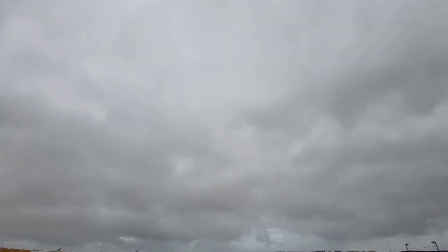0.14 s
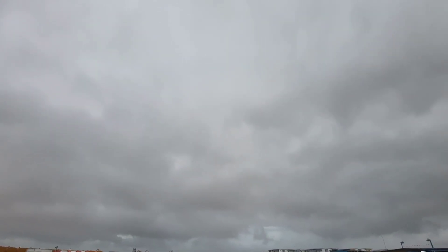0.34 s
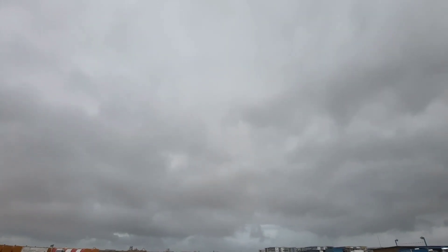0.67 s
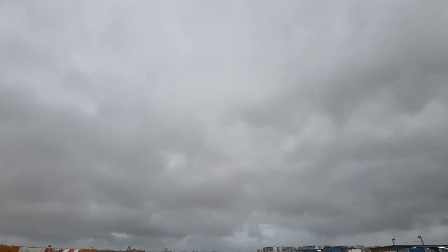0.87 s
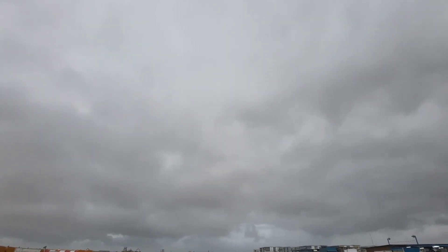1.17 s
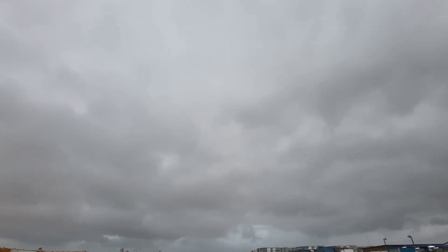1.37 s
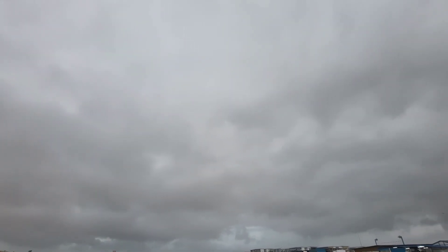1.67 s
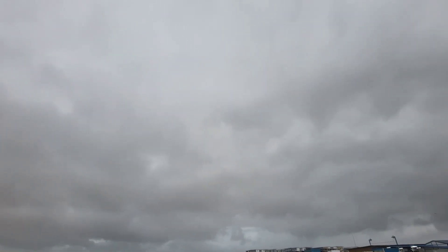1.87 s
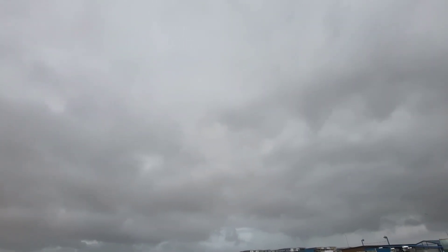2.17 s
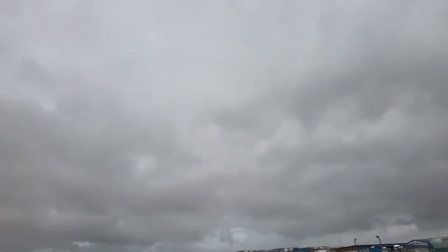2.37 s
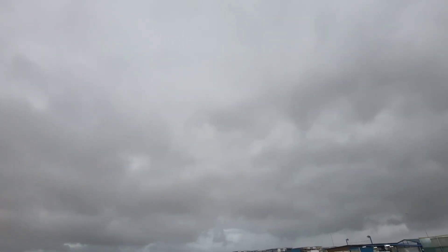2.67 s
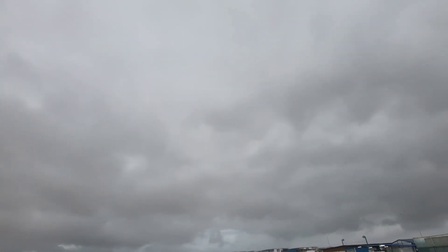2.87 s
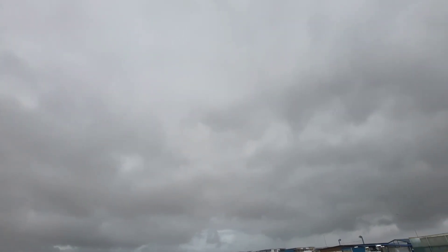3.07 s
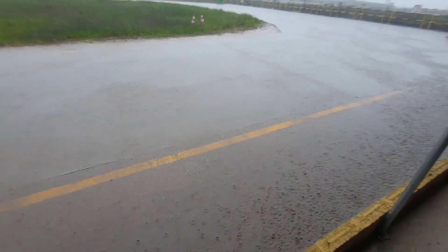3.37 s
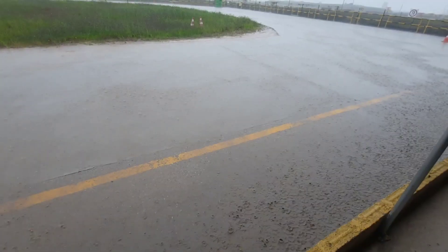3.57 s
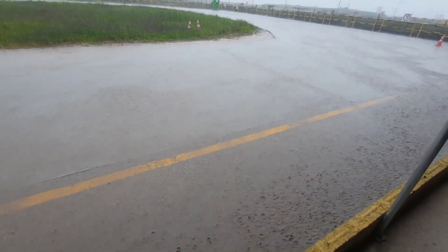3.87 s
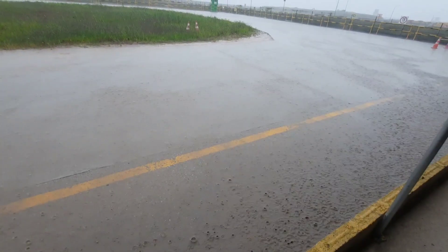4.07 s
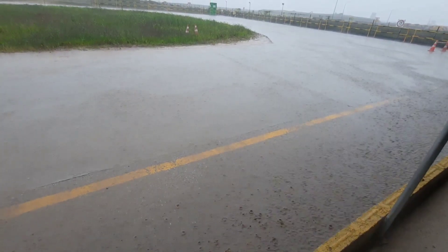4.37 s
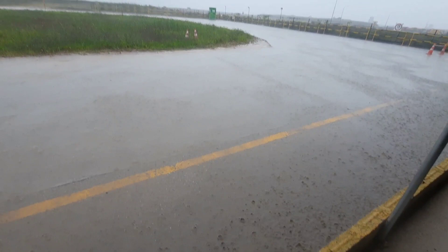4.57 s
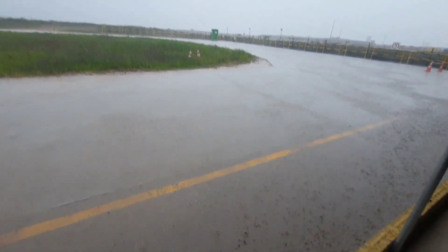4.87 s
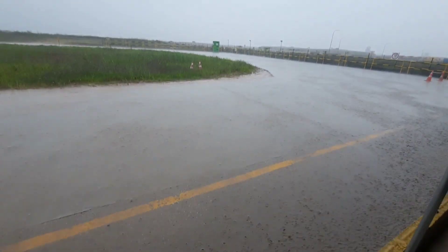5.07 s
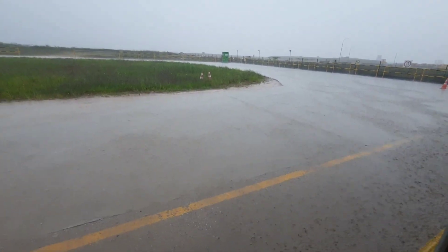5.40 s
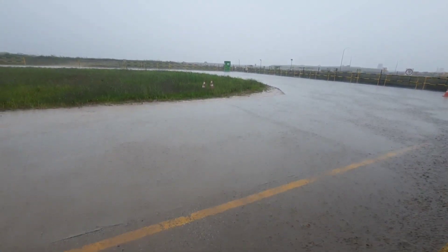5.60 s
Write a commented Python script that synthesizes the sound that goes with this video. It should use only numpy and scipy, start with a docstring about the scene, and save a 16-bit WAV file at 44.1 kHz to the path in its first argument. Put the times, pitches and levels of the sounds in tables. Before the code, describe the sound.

Faint handling scuffs and soft knocks over quiet dull air, a tiny silent gap, then a sudden loud downpour hissing on wet asphalt with wind rumble.

```python
"""A downpour on wet asphalt, heard from its edge: noise forms a dense wash, short bursts tick as nearer drops,
and low noise with brief pushes gives the rumble and buffets of wind. Before it, after which a short silence
falls, a camera pans in a quiet place: bursts of tiny slips scuff its housing and pushes ring two low modes
as soft knocks, over dull air noise and the sine tones of a faint hum, whine and whistle."""
import sys
import numpy as np
from scipy import signal
from scipy.fft import rfft, irfft, next_fast_len
from scipy.io import wavfile

SR = 44100
rng = np.random.default_rng(int(sys.argv[2]) if len(sys.argv) > 2 else 0)


def waveform_to_disk(signal):
    """Save audio, clipped to [-1, 1], as 16-bit WAV at the path in sys.argv[1]."""
    frames = np.transpose(np.atleast_2d(signal))
    scaled = np.clip(frames, -1, 1) * 32767
    samples = np.round(scaled).astype(np.int16)
    wavfile.write(sys.argv[1], SR, samples)


N = 253134
T = np.arange(N) / SR

# scuffs on the housing: peak_s, level_db, pitch_hz, nudge_db (push on the housing), swell_s, treble_db,
# clean_share (squeak, 0-1)
SCUFFS = [(.003, -51, 2000, -56, .005, -11, .1), (.079, -57, 2150, -54, .006, -9, 0.2),
          (.217, -52.5, 1860, -47.5, 0.013, -4, .4), (.261, -56, 2140, -51, 0.011, 9, .05),
          (.333, -62, 2200, -54, .012, 4, .05), (.376, -57, 2050, -47, 0.012, -10, .2),
          (.44, -64, 2250, -58, 0.013, -1, .1), (.485, -62, 2200, -54, .012, -1, .1),
          (0.546, -53.5, 1970, -48, 0.011, -10, .25), (.577, -58, 2100, -55, 0.0095, -13, .2),
          (.679, -56, 1920, -49, .014, 4, 0.2), (.713, -56.5, 2400, -56, 0.016, 3, .15),
          (.766, -55.5, 2200, -54, .004, -3, .15), (.812, -64, 2050, -66, .003, -8, .4),
          (.837, -60, 2150, -56, .002, -1, .05), (.871, -51, 1850, -53, 0.0061, -3, .3),
          (.935, -56.5, 2200, -48, .011, -2, 0), (.986, -55.5, 2060, -49, .008, -9, .3),
          (1.166, -47.5, 2140, -55, 0.0088, 1, .2), (1.226, -58.5, 2000, -54, .006, -13, .2),
          (1.356, -48.5, 2100, -51.5, 0.0081, -4.5, 0), (1.464, -55, 2150, -61, .006, 1, 0),
          (1.479, -52, 2130, -44.5, 0.0067, 0, 0), (1.538, -54, 2300, -52, 0.009, 1, .25),
          (1.609, -44.5, 2300, -53, 0.0025, 2, 0.34), (1.795, -52.5, 2070, -48.5, 0.0082, 3, .1),
          (1.845, -63, 2250, -58, 0.0066, -5, 0.2), (1.908, -50.5, 1940, -45, .004, -8, .35),
          (2.071, -49, 2130, -52, 0.0034, -1, .3), (2.264, -47, 2100, -55, 0.0058, -1, 0.1),
          (2.362, -48.5, 2210, -43.5, 0.002, -4, .25), (2.391, -56.5, 2300, -51, 0.0044, 3, .15),
          (2.522, -53, 2050, -58, .0015, -3, .15), (2.654, -70, 2100, -57, 0.011, -3, .1),
          (2.728, -46, 1880, -66, .002, -0.5, 0.63), (2.79, -59, 2050, -62, 0.0046, 5, .1),
          (2.808, -58.5, 1850, -60, .003, 3, .2), (2.89, -62, 2150, -58, .007, 7, .05),
          (2.984, -54.5, 2090, -46, 0.02, -2, 0), (3.043, -61, 2300, -54, .005, -5, .15),
          (3.168, -49.5, 2370, -47, 0.005, 2, .2), (3.184, -43.5, 1830, -50, .003, 4, 0.1)]
# colour of slips on the housing: freq_hz, gain_db
SCRAPE = [(150, -24), (500, -19), (900, -1), (1200, -3), (1500, -5), (1900, -1.5), (2400, -0.5), (2800, -7),
          (3400, -2.5), (3900, -12.5), (4700, -10), (5900, -9.5), (7500, -16), (11500, -21.5), (15500, -25)]
# progress of the camera's turn from the near splashes: time_s, turn (share)
TURN = [(3.35, 0.049), (4.15, 0.28), (4.55, 1.13), (5.7, 1.23)]


def amp(db):
    """Decibels to gain."""
    return 10 ** (np.asarray(db) / 20)


def evened(x):
    """Scales to an rms of one."""
    return x / np.sqrt(np.mean(x ** 2) + 1e-20)


def read(table, hz):
    """Columns of a spectrum table at the given frequencies, joined on a log axis."""
    f, *columns = np.transpose(table)
    return np.array([np.interp(np.log(hz + 1), np.log(f + 1), c) for c in columns])


def curve(table):
    """A control curve at every sample."""
    return np.interp(T, *np.transpose(table))


def filtered(x, gain):
    """Applies a gain, given as a function of frequency."""
    size = next_fast_len(x.shape[-1], True)
    spectrum = rfft(x, size) * gain(np.fft.rfftfreq(size, 1 / SR))
    return irfft(spectrum, size)[..., :x.shape[-1]]


def coloured(x, table):
    """Shapes a sound by a table of decibels over frequency."""
    return filtered(x, lambda hz: amp(read(table, hz)))


def mode(hz, centre_hz, width_hz):
    """Response of one resonance, gain one at its centre."""
    return 1j * hz * width_hz / (centre_hz ** 2 - hz ** 2 + 1j * hz * width_hz)


def wander(rate_hz):
    """Slow random drift of rms one."""
    return evened(filtered(rng.standard_normal(N), lambda hz: np.exp(-(hz / rate_hz) ** 2)))


def from_left(x, same, lag_s=0.0004755):
    """Row 0 reaches the left port, then the right; row 1 is what only the right one hears."""
    late = filtered(x[0], lambda hz: np.exp(-2j * np.pi * hz * lag_s))
    return np.array([x[0], same * late + np.sqrt(1 - same ** 2) * x[1]])


def port_noise():
    """White noise of unit density at two ports, alike in the bass and nearly unrelated in the treble."""
    # freq_hz, likeness (0-1), left_lead_rad
    ports = [(60, .88, .1), (220, .77, 0), (380, .78, -.1), (570, .68, -.5), (850, .55, -.8),
             (1250, .2, -1.1), (1650, .38, -3.6), (2200, .07, -3.2), (5000, .03, -3)]
    left, other = rng.standard_normal((2, N)) * np.sqrt(SR / 2)
    same = lambda hz: np.clip(read(ports, hz)[0], 0, 1)
    shared = filtered(left, lambda hz: same(hz) * np.exp(-1j * read(ports, hz)[1]))
    own = filtered(other, lambda hz: np.sqrt(1 - same(hz) ** 2))
    return np.array([left, shared + own])


def add(mix, start_s, sound):
    """Mixes a sound in from a time that may be before the start."""
    at = round(start_s * SR)
    sound = sound[:, max(-at, 0):]
    part = mix[:, max(at, 0):][:, :sound.shape[1]]
    part += sound[:, :part.shape[1]]


def puff(peak_s, length_s, centre_hz, width):
    """A short, low push of rms one at its peak; width is a share of the centre frequency."""
    window = np.exp(-((T - peak_s) / length_s) ** 2 / 2)
    noise = rng.standard_normal(N) * window
    push = filtered(noise, lambda hz: abs(mode(hz, centre_hz, width * centre_hz)) ** 2)
    return push * np.linalg.norm(window) / np.linalg.norm(push)


def still_air():
    """A dull, lumpy background noise with an uneven bass."""
    # freq_hz, gain_db
    air_colour = [(25, -102), (58, -82.5), (120, -80.5), (200, -87), (245, -88), (305, -76.5), (400, -83),
                  (510, -83.5), (750, -88), (1300, -99.5), (2300, -100), (2800, -106), (3900, -116),
                  (6000, -115), (8000, -125), (15000, -129)]
    air_db, lumpy_db = -1, 2
    bass_db, uneven_db, uneven_hz = -3, 3.5, 7
    lumps = evened(filtered(rng.standard_normal(N), lambda hz: np.exp(-hz / 25)))
    noise = rng.standard_normal((2, N)) * np.sqrt(SR / 2) * amp(air_db + lumpy_db * lumps)
    air = from_left(coloured(noise, air_colour), same=0.62)
    bass = filtered(air, lambda hz: 1 / (1 + (hz / 190) ** 4))
    return air + bass * (amp(bass_db + uneven_db * wander(uneven_hz)) - 1)


def tone(pitch_hz, waver_db=1.5):
    """A sine of steady pitch, near rms one, whose strength wavers."""
    waver = evened(filtered(rng.standard_normal(N), lambda hz: np.exp(-hz / 2)))
    return amp(waver_db * waver) * np.sqrt(2) * np.sin(2 * np.pi * pitch_hz * T)


def switched(runs, ramp_s=0.025):
    """Strength of a tone that comes and goes in short ramps."""
    strength = np.zeros(N)
    for start_s, stop_s, level_db in runs:
        inside_s = np.minimum(T - start_s, stop_s - T)
        strength += amp(level_db) * np.clip(inside_s / ramp_s + 0.5, 0, 1)
    return strength


def motors():
    """Hum of a distant machine, a whine (perhaps a small motor) and a thin whistle that come and go."""
    # pitch_hz, level_db
    hum_line = (236.5, -68)
    # start_s, stop_s, level_db (added to the idle whine)
    whine_runs = [(0, 0.204, -72), (.38, .57, -72), (0.863, 1.13, -74), (1.27, 1.48, -75), (1.82, 2, -72.5),
                  (2.16, 2.38, -77.5)]
    # start_s, stop_s, level_db
    whistle_runs = [(.43, .52, -83), (.58, .66, -78), (.78, 1.2, -88), (1.26, 1.46, -82)]
    whine_hz, whine_idle_db, whistle_hz = 885, -87, 3149
    hum = amp(hum_line[1]) * tone(hum_line[0])
    whine = (amp(whine_idle_db) + switched(whine_runs)) * tone(whine_hz)
    whistle = switched(whistle_runs) * tone(whistle_hz)
    return hum + whine + whistle


def thumps():
    """Low noise pushes as the whole camera is jogged, alike at both ports."""
    # peak_s, level_db, length_s, centre_hz
    jogs = [(0.027, -51.5, .016, 90), (0.317, -58, .014, 150), (3.109, -49, .008, 80),
            (3.15, -50, 0.0095, 105)]
    return sum(amp(db) * puff(s, length_s, centre_hz, width=1.3) for s, db, length_s, centre_hz in jogs)


def knocks():
    """Soft uneven pushes, alone or just after a scuff, ring the two low modes of the housing."""
    # peak_s, level_db, upper_db (upper mode over lower)
    lone_knocks = [(.008, -40.5, -12), (.322, -43.5, -11), (.787, -44, -24), (.842, -50, 16),
                   (1.134, -47, 0), (1.331, -47.5, 14), (1.654, -48.5, 1), (2.015, -51, -12),
                   (2.114, -50, -6), (2.469, -48, 16), (2.85, -44, -14), (3.159, -48, 7),
                   (3.206, -41.5, 10)]
    # lower and upper mode: centre_hz, width_hz (both scaled by the grip)
    housing = [(315, 23), (480, 23)]
    push_s, lead_s, grip_spread = 0.00698, 0.04, 0.022
    nudge_lag_s, nudge_upper_db = 0.00699, 7
    out, t = np.zeros((2, N)), np.arange(SR // 4) / SR - lead_s
    nudges = [(s + nudge_lag_s, nudge_db, nudge_upper_db) for s, _, _, nudge_db, *_ in SCUFFS]
    for s, db, upper_db in lone_knocks + nudges:
        force = rng.standard_normal((2, len(t))) * np.exp(-(t / push_s) ** 2)
        grip = np.exp(grip_spread * rng.standard_normal())  # the hand shifts the modes a little

        def response(hz):
            lower, upper = (mode(hz * grip, *m) for m in housing)
            return (lower + amp(upper_db) * upper) * mode(hz, 380, 600)

        body = filtered(force, response)
        body = np.sqrt(2) * body / abs(body).max(1, keepdims=True)
        add(out, s - lead_s - push_s, amp(db) * body)
    return from_left(out, same=0.7)


def rubbing():
    """Duller rubs as the grip shifts: noise rings at a pitch, catching unevenly as it swells and dies."""
    # peak_s, level_db, rise_s, pitch_hz
    rubs = [(.02, -49, 0.061, 1380), (.32, -58.5, 0.09, 1280), (3.093, -50, 0.002, 1150)]
    # freq_hz, gain_db
    rub_colour = [(150, -11), (350, 3), (700, -0.5), (950, 0), (1150, -0.5), (1550, -6), (2500, -11),
                  (6000, -29), (15000, -35)]
    ring, ring_width_hz, fade_s = 1.3, 200, 0.084
    catch_db, catch_hz = 2, 70
    out = np.zeros((2, N))
    for s, db, rise_s, pitch_hz in rubs:
        noise = coloured(rng.standard_normal((2, N)), rub_colour)
        scrape = filtered(noise, lambda hz: 1 + ring * mode(hz, pitch_hz, ring_width_hz))
        envelope = np.exp(-np.maximum((s - T) / rise_s, (T - s) / fade_s))
        out += amp(db) * evened(scrape) * envelope
    return from_left(out * evened(amp(catch_db * wander(catch_hz))), same=0.21)


def rustle():
    """Faint, duller single slips at random times, each a puff of noise with the scrape colour."""
    slips_per_s, level_db, spread_db = 140, -68, 3
    die_s, dull_hz = 0.0041, 5000
    t = np.arange(SR // 15) / SR
    strength = amp(spread_db * np.minimum(rng.exponential(1, N), 3))
    hits = (rng.random(N) < slips_per_s / SR) * strength
    contact = signal.oaconvolve(hits, t * np.exp(-t / die_s))[:N]
    slips = filtered(rng.standard_normal((2, N)) * contact, lambda hz: 1 / np.hypot(1, hz / dull_hz))
    return amp(level_db) * evened(from_left(coloured(slips, SCRAPE), same=0.63))


def ripple(depth_db, count=110):
    """Random gains at log-spaced frequencies: freq_hz, gain_db."""
    gain_db = depth_db * np.clip(rng.standard_normal(count), -2, 2)
    return np.transpose([np.geomspace(900, 15000, count), gain_db])


def squeak(pitch_hz, size, wobble=0.025, wobble_hz=90):
    """Slips that fall into step give a short, unsteady tone of rms one."""
    drift = evened(filtered(rng.standard_normal((2, size)), lambda hz: np.exp(-hz / wobble_hz)))
    turns = np.cumsum(pitch_hz * (1 + wobble * drift), axis=1) / SR + rng.random((2, 1))
    return np.sqrt(2) * np.sin(2 * np.pi * turns)


def scuffs():
    """Tiny slips swell, let go with a snap and a squeak, ring the shell and die in a short, duller tail."""
    ring, ring_width_hz, treble_hz = 0.85, 260, 3500
    ragged_db, grit, slip_samples = 4, 0.39, 30
    lead_s, steep, fall_s, snap, snap_s = 0.08, 1.8, 0.016, 0.31, 0.0016
    tail_db, tail_s, tail_hz = -11, 0.07, 5000
    out, t = np.zeros((2, N)), np.arange(SR // 3) / SR - lead_s
    after_s = np.maximum(t, 0)
    release = np.exp(-(after_s / fall_s) ** 2) + snap * (t > 0) * np.exp(-after_s / snap_s)
    for s, db, pitch_hz, _, swell_s, treble_db, clean_share in SCUFFS:
        # every contact point rings a little differently
        slips = coloured(rng.standard_normal((2, len(t))), ripple(ragged_db))
        steps = np.repeat(rng.standard_normal(len(t)), slip_samples)[:len(t)]
        slips = slips * np.exp(grit * steps)

        def shell(hz):
            shelf = hz ** 4 / (hz ** 4 + treble_hz ** 4)
            return (1 + ring * mode(hz, pitch_hz, ring_width_hz)) * amp(treble_db * shelf)

        scrape = evened(filtered(coloured(slips, SCRAPE), shell))
        clean = np.sqrt(clean_share) * squeak(pitch_hz, size=len(t))
        contact = np.sqrt(1 - clean_share) * scrape + clean
        stroke = (1 - amp(tail_db)) * contact * release
        dull = filtered(scrape, lambda hz: 1 / np.hypot(1, hz / tail_hz))
        ringing = amp(tail_db) * dull * np.exp(-after_s / tail_s)
        swell = 1 / (1 + abs(np.minimum(t, 0) / swell_s) ** steep)
        add(out, s - lead_s, amp(db) * (stroke + ringing) * swell)
    return from_left(out, same=0.71)


def wind():
    """Lumpy low noise: gusts drive its deep part, its upper part fades in the turn, and buffets strike."""
    # freq_hz, gain_db (before levelling)
    rumble_colour = [(22, -35), (33, -21), (47, -4), (57, -2), (66, -0.5), (76, 3.5), (88, -3.5),
                     (103, -1.5), (118, -5), (131, 0.5), (146, -5), (180, -8.5), (260, -26), (600, -63)]
    # time_s, deep_gain_db
    gust = [(3.35, -4.5), (3.85, -7), (4.35, 0.5), (4.62, 1.5), (4.8, 4.5), (4.95, -5), (5.2, 1), (5.7, -3)]
    # peak_s, level_db (before the port gains), length_s, centre_hz, port (0 left to 1 right)
    buffets = [(3.504, -24, 0.016, 85, 0.46), (3.55, -27, 0.011, 300, 0.44), (3.622, -26.5, .016, 70, 0.44),
               (3.78, -21.5, 0.027, 129, .5), (4.022, -22.5, 0.027, 85, 0.45),
               (4.145, -23.5, 0.023, 105, 0.47), (4.434, -20, 0.015, 75, 0.64),
               (4.441, -21, 0.019, 365, 0.44), (4.546, -19.5, 0.026, 116, 1), (4.709, -20, 0.037, 96, 0.67),
               (4.787, -25, .05, 315, 0.56), (4.83, -15.5, 0.011, 70, 0.75),
               (5.042, -17, 0.025, 71.4, 0.47), (5.127, -26, 0.028, 100, 0.44),
               (5.369, -22, 0.024, 316, 0.48)]
    base_db, lumpy_db, lumpy_hz = -26.5, 1, 8
    deep_hz, upper_db, upper_turn_db = 105, 2, -3
    rumble = evened(coloured(port_noise(), rumble_colour)) * amp(base_db + lumpy_db * wander(lumpy_hz))
    deep = filtered(rumble, lambda hz: 1 / (1 + (hz / deep_hz) ** 8))
    upper = (rumble - deep) * amp(upper_db + upper_turn_db * curve(TURN))
    out = deep * amp(curve(gust)) + upper
    for s, db, length_s, centre_hz, port in buffets:
        port_gains = np.sqrt(2) * np.array([[1 - port], [port]])
        out += amp(db) * port_gains * puff(s, length_s, centre_hz, width=0.52)
    return out


def near_drops():
    """Random splashes about a millisecond long, of 24 noise shapes, weighted to the treble."""
    drops_per_s, spread_db, across = 2600, 3.5, 0.18  # rate at each port
    size = amp(spread_db * np.minimum(rng.exponential(1, (2, N)), 5)) * rng.choice([-1, 1], (2, N))
    hits = size * (rng.random((2, N)) < drops_per_s / SR)
    kind, t = rng.integers(0, 24, (2, N)), np.arange(256) / SR
    near = np.zeros((2, N))
    for k in range(24):
        splash = evened(rng.standard_normal(len(t)) * np.exp(-t / 0.00032))
        near += signal.oaconvolve(hits * (kind == k), splash[None], axes=1)[:, :N]
    # splashes on the right reach the left port 10 samples later
    near[0] = (near[0] + across * np.roll(near[1], 10)) / np.hypot(1, across)
    return evened(filtered(near, lambda hz: hz / (hz + 1200))) * np.sqrt(SR / 2)


def rain():
    """Countless far drops merge into flickering noise; near drops tick in it; the turn recolours both."""
    # freq_hz, left_gain_db, right_gain_db
    wash_colour = [(40, -72, -85), (231, -57, -58.5), (295, -49, -49), (454, -53, -57), (945, -51, -52.5),
                   (1810, -54.5, -56), (2210, -55.5, -52.5), (2870, -58.5, -57.5), (4600, -58.5, -56.5),
                   (5270, -65, -59), (6230, -65.5, -60.5), (7750, -68.5, -69), (8720, -69.5, -70),
                   (9550, -72, -77.5), (11860, -66.5, -72), (15500, -76, -79.5)]
    # colour change at a turn of one: freq_hz, left_gain_db, right_gain_db
    turned_colour = [(500, -0.17, 0.26), (2500, -.5, -1.3), (4000, 0, -1.46), (5600, -1.5, -4),
                     (9100, 0, 0.4), (15000, -1, 4.5)]
    near_db, flicker_db = -8, 0.38
    flicker = evened(filtered(rng.standard_normal((2, N)), lambda hz: 1 / (1 + (hz / 35) ** 2)))
    far = port_noise() * amp(flicker_db * flicker)
    wash = coloured(far + amp(near_db) * near_drops(), wash_colour)
    return wash + curve(TURN) * (coloured(wash, turned_colour) - wash)


def scene():
    """The quiet place stops dead; after a short gap the downpour starts at full strength."""
    quiet_end_s, rain_start_s = 3.276, 3.341
    handling = thumps() + knocks() + rubbing() + rustle() + scuffs()
    quiet = (still_air() + motors() + handling) * np.clip((quiet_end_s - T) / 0.0025, 0, 1)
    downpour = (wind() + rain()) * np.clip((T - rain_start_s) / 0.0028, 0, 1)
    return quiet + downpour


def record(dry):
    """The recorder's band limit, a steep low-pass."""
    edge_hz = 15850
    lowpass = signal.firwin(701, edge_hz, window=("kaiser", 9), fs=SR)
    return signal.oaconvolve(dry, lowpass[None], "same")


dry = scene()
out = record(dry)
waveform_to_disk(out)
```